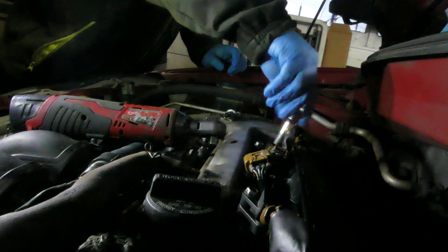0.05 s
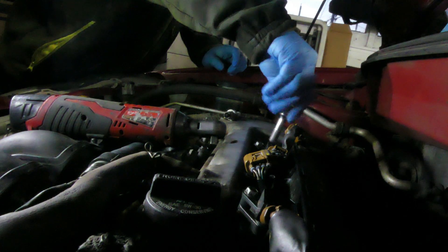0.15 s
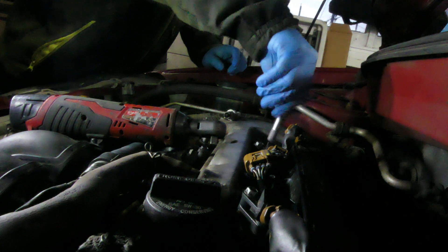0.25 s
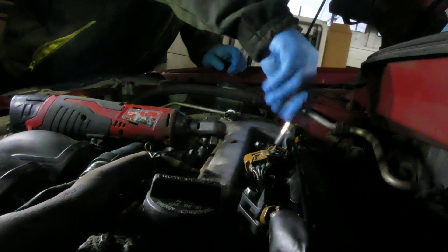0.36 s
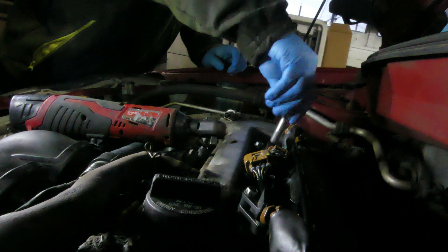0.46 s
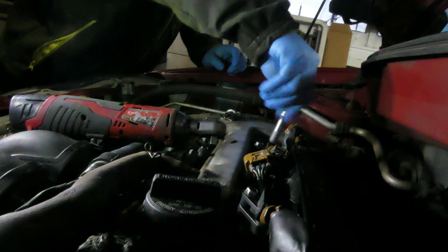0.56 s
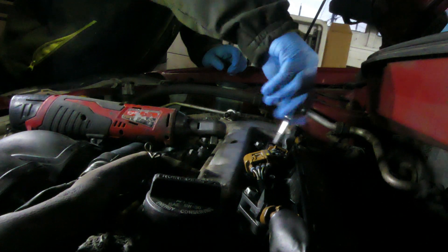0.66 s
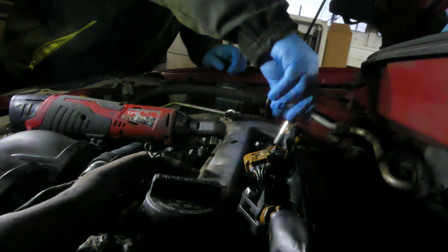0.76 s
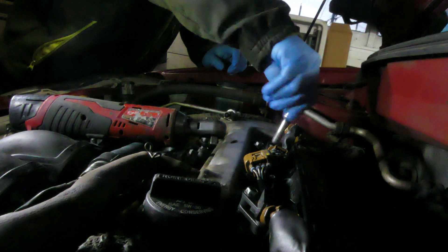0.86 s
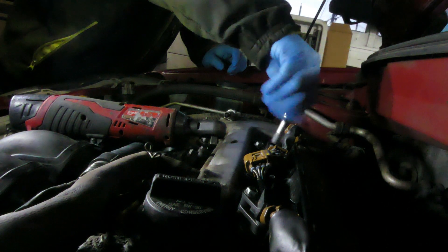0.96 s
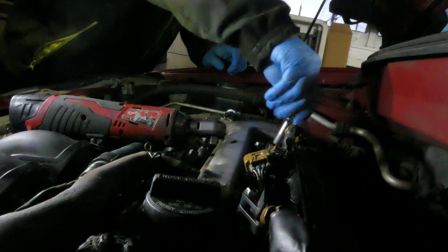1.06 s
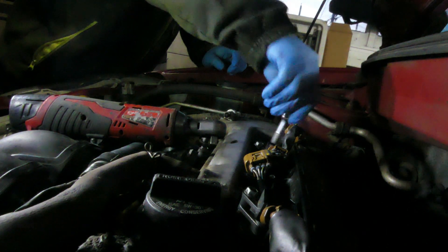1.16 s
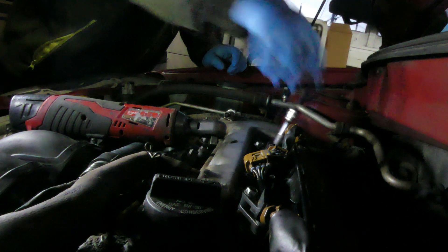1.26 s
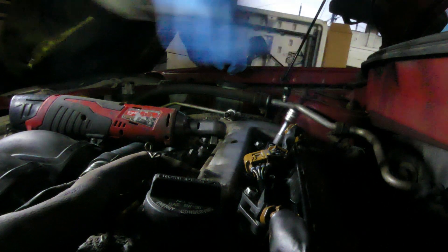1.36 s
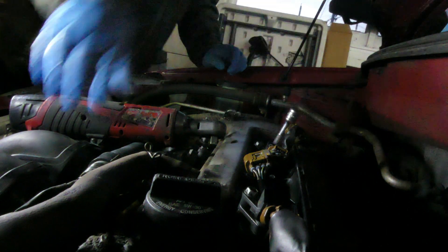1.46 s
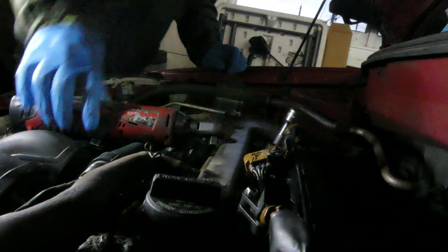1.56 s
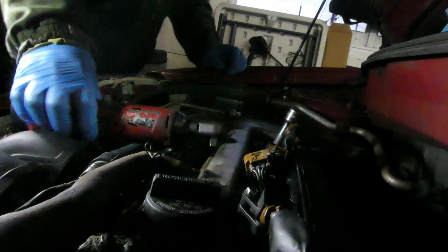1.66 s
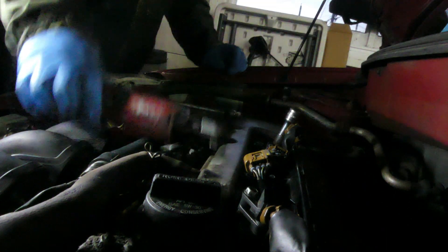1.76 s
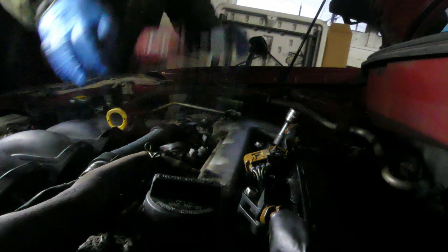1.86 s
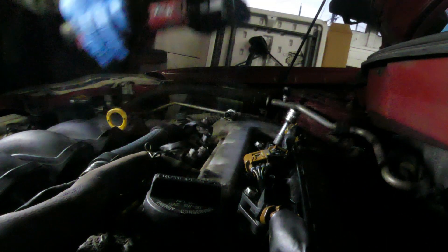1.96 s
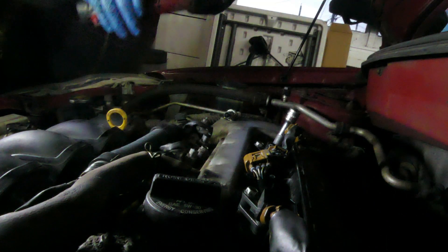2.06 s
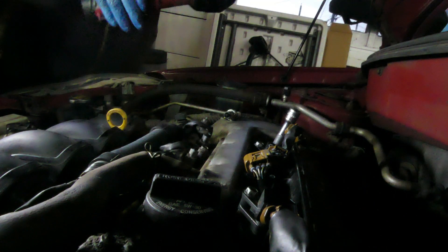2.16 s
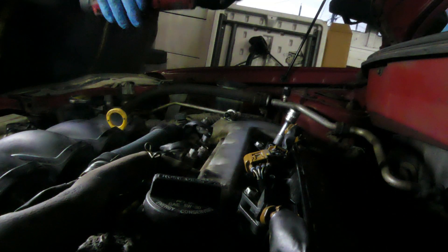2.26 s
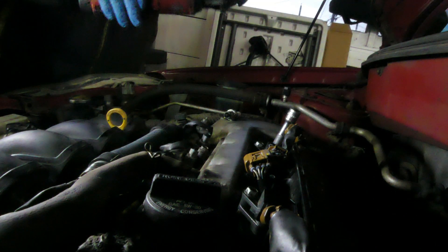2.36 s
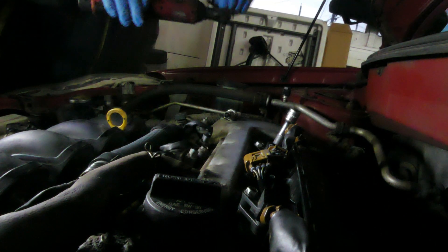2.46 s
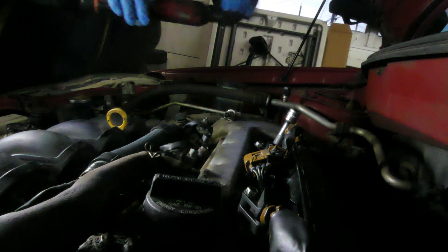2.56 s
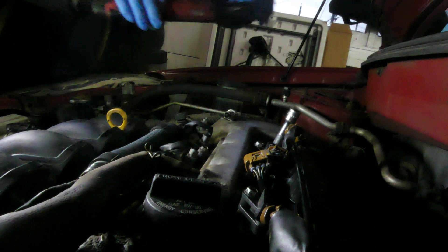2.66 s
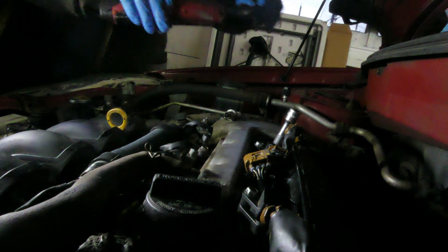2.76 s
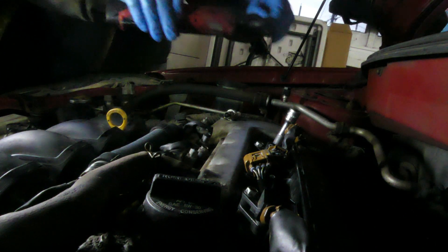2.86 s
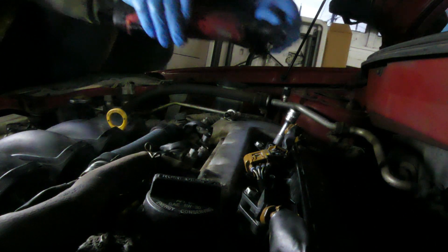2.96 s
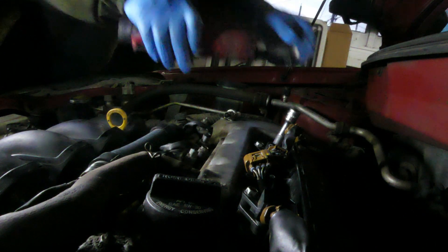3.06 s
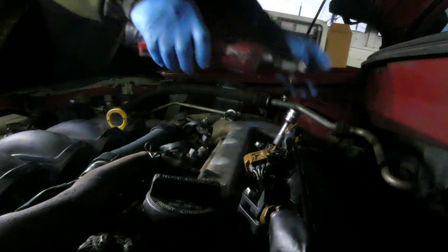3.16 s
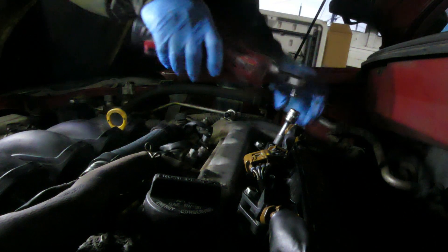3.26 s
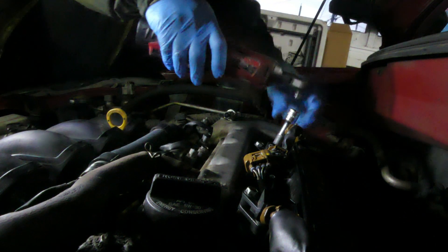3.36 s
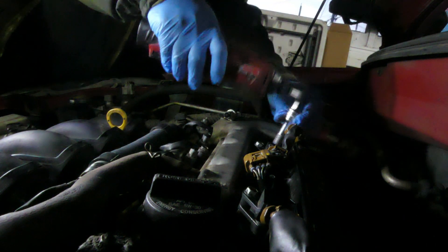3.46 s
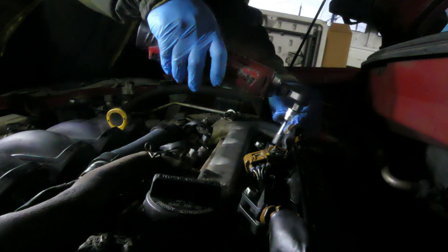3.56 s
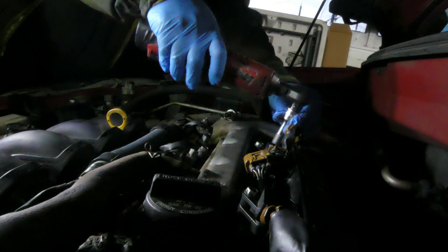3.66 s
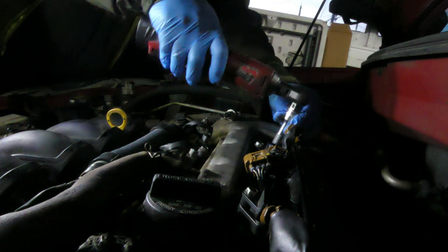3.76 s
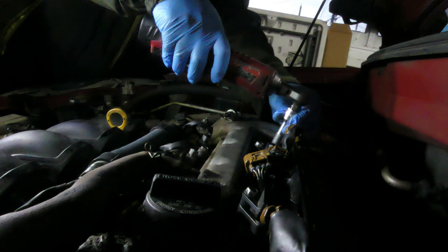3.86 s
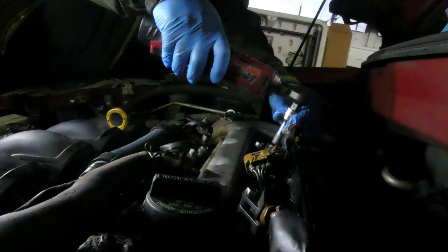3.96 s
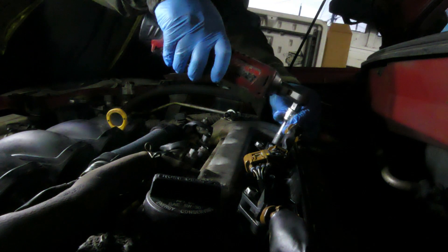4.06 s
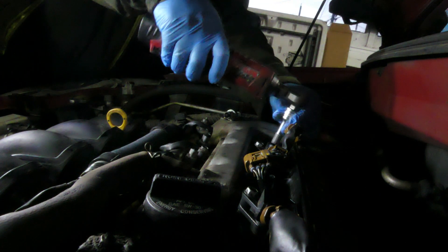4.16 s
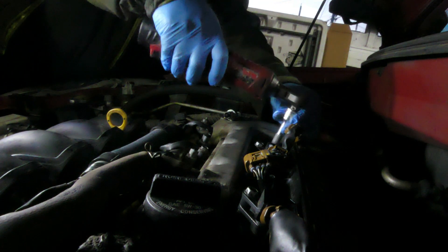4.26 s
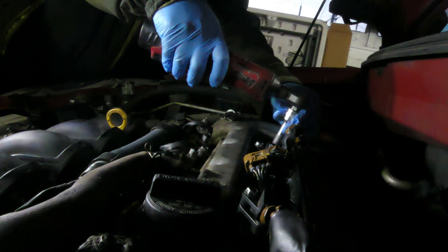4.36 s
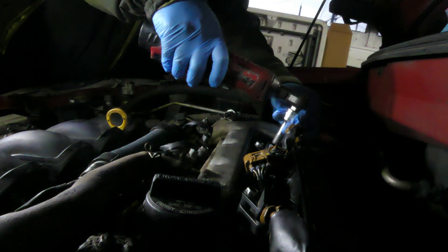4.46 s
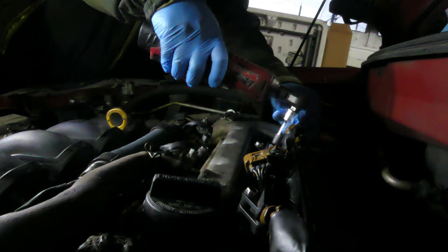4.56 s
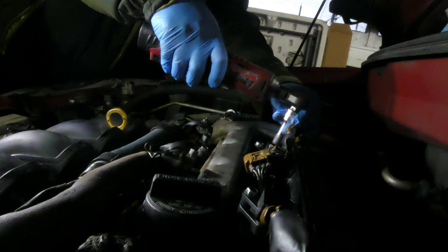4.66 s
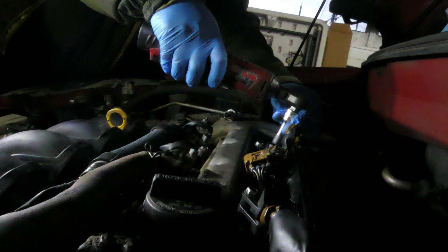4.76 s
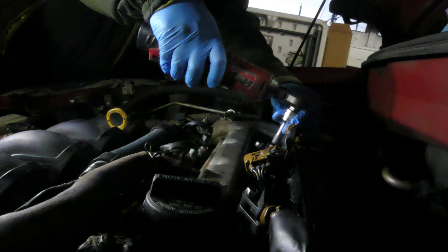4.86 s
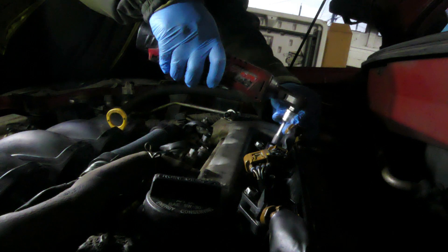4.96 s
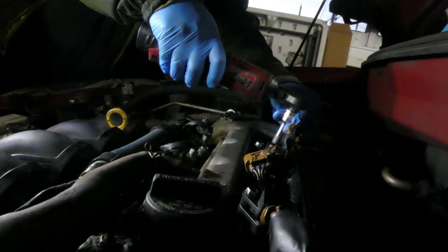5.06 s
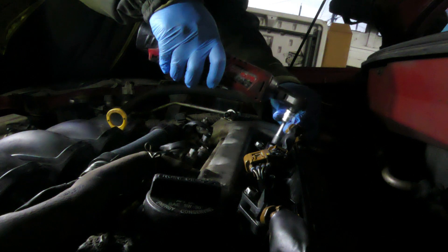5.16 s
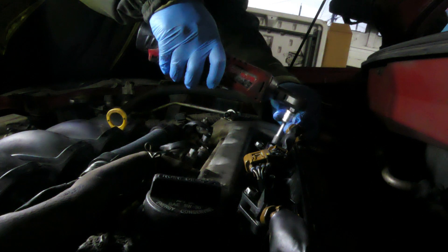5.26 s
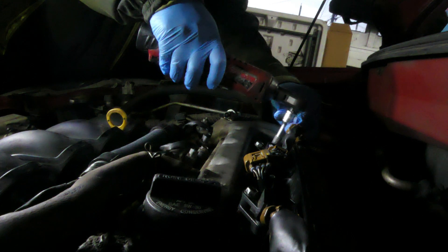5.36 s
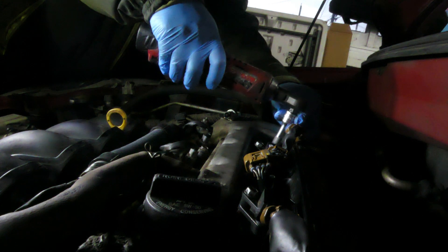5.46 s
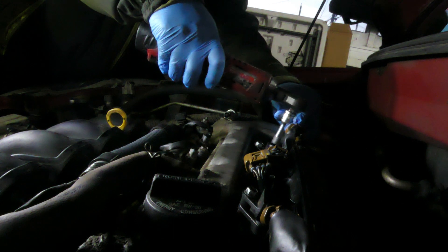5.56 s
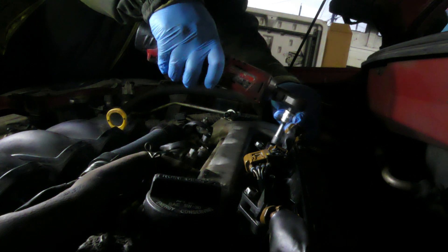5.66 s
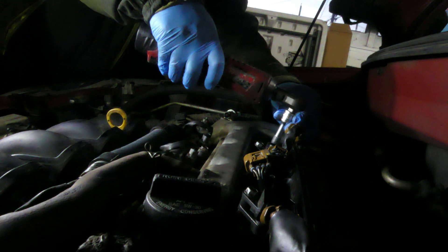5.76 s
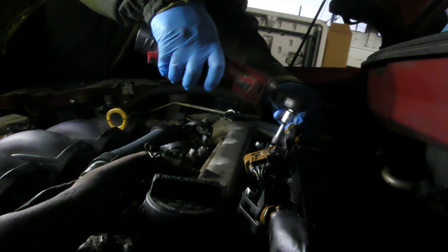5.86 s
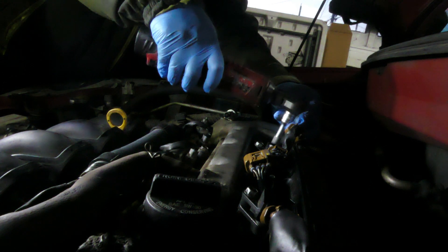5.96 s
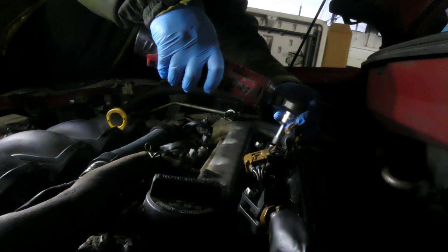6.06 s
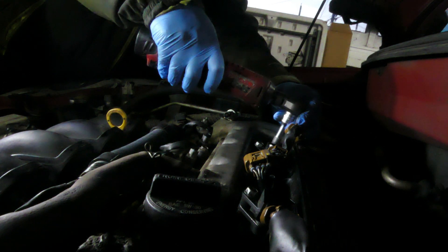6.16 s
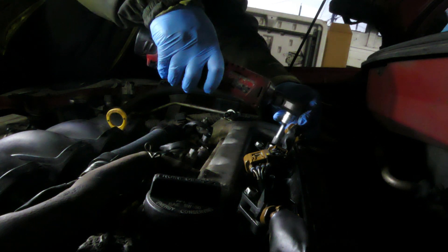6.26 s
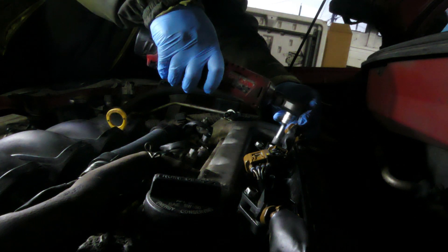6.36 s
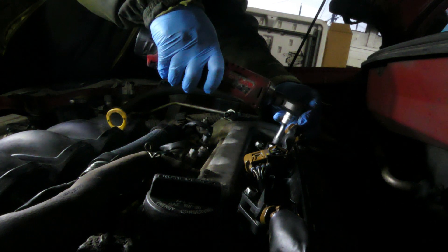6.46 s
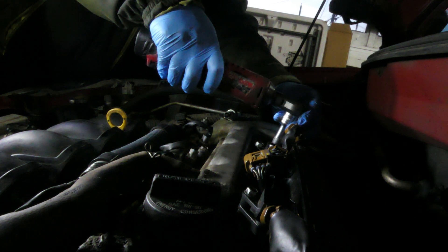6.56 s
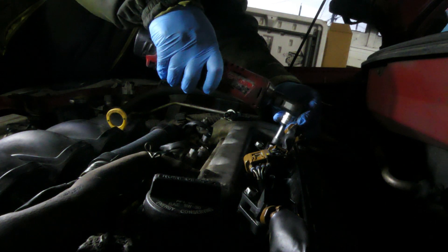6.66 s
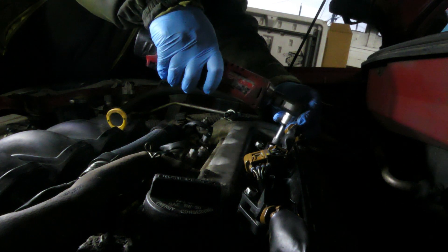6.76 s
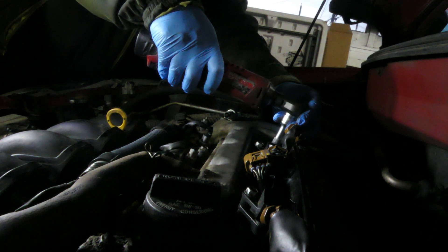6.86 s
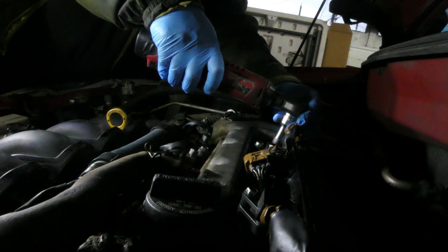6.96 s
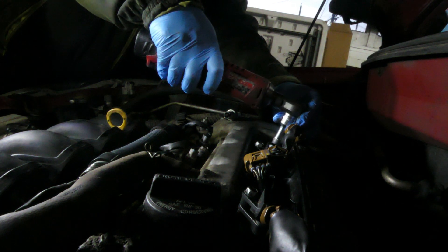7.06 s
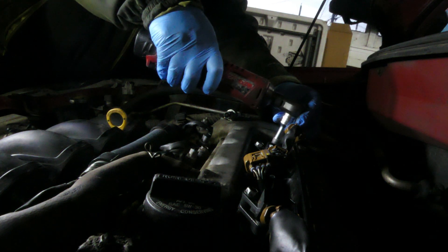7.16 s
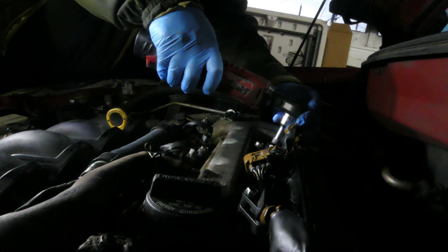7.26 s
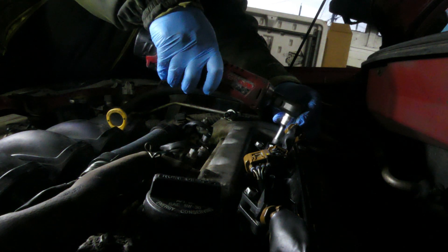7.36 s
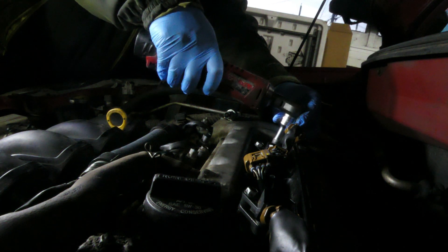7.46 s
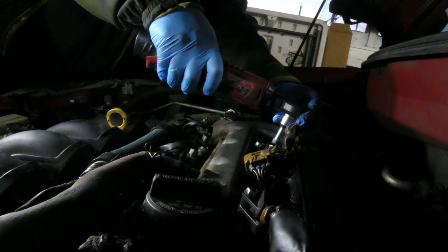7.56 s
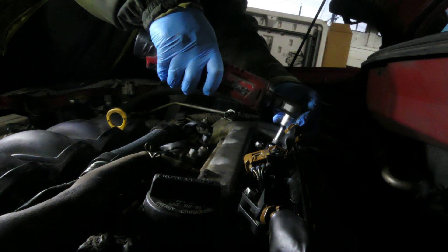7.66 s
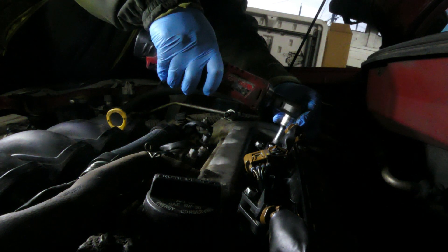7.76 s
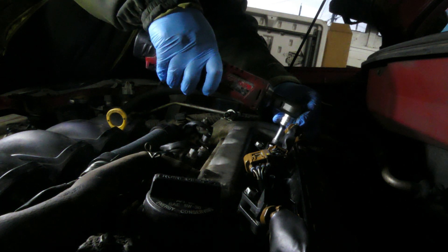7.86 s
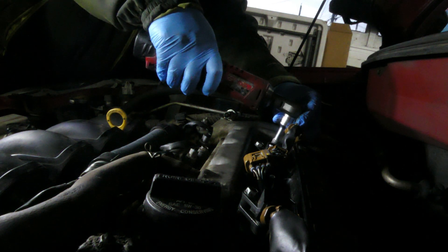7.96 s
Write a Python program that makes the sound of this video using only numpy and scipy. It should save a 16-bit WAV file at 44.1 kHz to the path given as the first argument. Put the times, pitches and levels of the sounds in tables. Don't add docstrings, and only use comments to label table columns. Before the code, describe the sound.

Close stereo perspective at an open engine bay, with a low, steady garage hum. From 0 to 1.3 s a gloved hand turns a socket extension: faint irregular ticks and small clinks, clearest around 0.6-1.1 s, with soft sleeve rub. Around 1.5 s the glove brushes metal; at 1.76 s a hard, hollow clunk as the tool is grabbed, then cloth rustle, a tiny rubber creak at 1.9 s and scattered knocks to 3.1 s, with a bright sharp snap at 2.92 s. After a tiny electric whine, the cordless ratchet spins at 3.23 s, bright and chattering, slowing from 3.5 s into separate clicks that stop near 4.05 s. At 4.12 s it restarts under load: gritty gear whirr, rapid metallic pawl clatter and yoke rattle. Speed sags around 4.6 s, recovers, drops to distinct clicks at 5.4-5.7 s, then climbs and runs on, wavering, to the end at 8 s.

```python
import sys
import numpy as np
from scipy import signal
from scipy.io import wavfile
from scipy.ndimage import uniform_filter1d

SR = 44100
rng = np.random.default_rng(int(sys.argv[2]) if len(sys.argv) > 2 else 0)


def convert_level_to_amplitude(level_db):
    exponent = np.asarray(level_db, float) / 20
    return 10 ** exponent


def file_out(sig):
    cols = np.atleast_2d(sig).T
    lim = np.clip(cols, -1, 1)
    pcm = np.round(lim * 32767).astype(np.int16)
    wavfile.write(sys.argv[1], SR, pcm)


N = 352800
T = np.arange(N) / SR

# (start [s], spin-up [s], whirr [dB], pawl [dB], yoke [dB], mesh tone [dB], start-up [dB])
PULLS = [
    (3.228, 0.014, -33.5, -28, -57, 6.5, -12),
    (4.117, 0.046, -34.5, -29.5, -31, -2.5, -12),
]
# (time [s], gear mesh [Hz], drive [dB], lean of load from yoke to pawl [dB])
FREE = [(3.23, 904, 1.5, -2), (3.34, 908, 0, 3.5), (3.44, 808, -2, -2), (3.54, 657, 1, 0),
        (3.63, 548.5, 1, 0), (3.75, 397, -2.5, -3), (3.85, 301.6, -2, 0), (3.99, 171.4, 3.5, 6),
        (4.095, 101.5, -1.5, 0)]
# (time [s], gear mesh [Hz], drive [dB], lean of load from yoke to pawl [dB])
LOADED = [(4.12, 938, 5.5, 3.5), (4.27, 988, -1.9, -3.5), (4.43, 795, -3, -4.5), (4.54, 679.9, -1.5, -0.5),
          (4.63, 584, 1.5, 0.5), (4.72, 650, 2, 1), (4.85, 745.6, -2.6, -5.5), (5.04, 791.7, -0.2, 0.5),
          (5.2, 751, -3, -3.5), (5.3, 660.2, -2, -3), (5.42, 475.2, 1, 2.5), (5.6, 299.5, -2, 3),
          (5.71, 487.4, 6, 9), (5.85, 589, 0.5, -0.5), (6.11, 647.7, -0.1, 0.5), (6.38, 534.5, 0, 1.5),
          (6.55, 507.3, -0.5, 2.5), (6.82, 486, 0.3, 2.5), (7.1, 658.6, 0.65, 1.5), (7.35, 704, -0.9, -1),
          (7.5, 681.5, -1, -1), (7.66, 664.7, 0.5, 2), (7.8, 654.4, .5, 3.5), (7.96, 651.4, 1.2, 1.5),
          (8.0, 650, -3, -2)]
# (from [s], to [s])
SLOW = [
    (3.465, 4.145),
    (5.41, 5.745),
]
# (time [s], first tooth [dB], second tooth [dB])
SNAPS = [(3.4746, -14, -12), (3.4946, -13, -16), (3.5115, -15, -14), (3.533, -13, -18), (3.553, -16, -18),
         (3.572, -17, -18), (3.594, -13, -8), (3.617, -19, -10), (3.6405, -12, -13), (3.6673, -8.5, -18),
         (3.695, -8.5, -24), (3.725, -6.5, -12), (3.7561, -8, -9), (3.791, -9, -5), (3.8312, -12, -10),
         (3.8763, -5.5, -14), (3.931, -8.5, -7), (4.005, -8.5, -5.5), (4.016, -30, -60), (3.989, -43, -57),
         (4.116, -34, -40), (4.126, -11.5, -28), (4.133, -10, -20), (5.427, -11, -13), (5.454, -14, -23),
         (5.485, -15, -22), (5.519, -14, -13), (5.5553, -15, -6), (5.599, -13, -9), (5.643, -11, -2.5),
         (5.6755, -12, -11), (5.704, -15, -11), (5.73, -12, -19)]
# (time [s], peak [dB])
RETURNS = [(3.5174, -25), (3.5588, -28), (3.5764, -28), (3.6192, -21), (3.6893, -22), (3.705, -26),
           (3.7174, -24), (3.7494, -22), (3.7684, -26), (3.7844, -26), (3.8053, -27), (3.8277, -31),
           (3.8601, -23), (3.9305, -26), (3.9414, -29), (4.005, -29), (4.0204, -28), (4.118, -28),
           (5.4123, -17), (5.438, -17), (5.468, -17.5), (5.4776, -26), (5.4992, -24), (5.5323, -22),
           (5.5464, -25), (5.5735, -19), (5.5874, -29), (5.6196, -20), (5.6344, -25), (5.6598, -16),
           (5.6895, -14), (5.7024, -18), (5.7174, -10.5), (5.7433, -18)]
# (frequency [Hz], density [dB per Hz])
WHIRR = [(88, -53), (150, -41.5), (406, -17), (475, -24), (774, -2), (980, -9), (1100, -16.5), (1230, -11),
         (1900, -9), (2150, -14.5), (2500, -8), (2920, -13), (3300, -5.5), (5150, -9), (5680, 44),
         (7620, -9.5), (9630, -9), (11500, 7), (12900, 6), (16000, -17)]
# (mesh frequency [Hz], level [dB])
MESH_BODY = [(120, -93), (440, -69), (500, -54), (590, -49), (650, -43), (705, -49.5), (785, -38),
             (880, -56), (1000, -57)]
# (mesh frequency [Hz], level [dB])
FOURTH_BODY = [(120, -66), (170, -62), (260, -70), (330, -62), (365, -49), (425, -49), (470, -59),
               (540, -51), (600, -50), (680, -57), (790, -45), (860, -47), (910, -60), (1000, -62)]
# (frequency [Hz], level [dB], t60 [s])
PAWL = [(12500, 13, 0.0058), (12570, -4, 0.01), (13120, -1, 0.016), (13540, -5, 0.0085),
        (10970, -12, 0.0089)]
# (frequency [Hz], level [dB], t60 [s])
PAWL_RUNNING = [(12360, 0.5, 0.018), (12970, 5.5, 0.019), (13136, 8.5, 0.014), (13570, -5, 0.011),
                (12900, -20, 0.0056), (11870, -13, 0.011)]
# (frequency [Hz], level [dB], t60 [s])
YOKE = [(5630, -1.5, 0.021), (5800, 2, 0.01), (6480, -1, 0.015), (6360, -21, 0.026), (7200, -6, 0.013),
        (8140, -5, 0.01), (8920, -2, 0.0069), (3980, -10.5, 0.01)]
# (from [s], to [s], level [dB])
CHOPS = [
    (3.201, 3.223, 13),
    (4.083, 4.11, 2.5),
]
# (order [1], level [dB])
CHOP = [(1, -60), (2, -51), (3, -54), (4, -64), (5, -72)]
# (frequency [Hz], level [dB], t60 [s])
SOCKET = [(1670, 5, 0.015), (5600, 6, 0.026), (6050, 2, 0.013), (6600, -6, 0.017), (7160, -4, 0.034),
          (8030, -2, 0.023), (3440, -15, 0.021)]
# (frequency [Hz], level [dB], t60 [s])
HOUSING = [(650, -14, 0.028), (980, 16, 0.0064), (1520, 12, 0.013), (1970, 1, 0.021), (2390, -7, 0.019),
           (2640, 1, 0.031), (3600, 12, 0.013), (4120, 4, 0.013), (4640, -1, 0.017), (5500, -3, 0.014),
           (6000, 3, 0.02), (7100, 4.5, 0.039)]
# (frequency [Hz], level [dB], t60 [s])
LATCH = [(6800, -15, 0.042), (9100, -21, 0.025), (12550, 1, 0.042), (12530, -2, 0.043), (12200, -12, .04),
         (12200, -5, 0.028)]
# (time [s], peak [dB], dull part [dB], bright part [dB], struck spot [Hz])
TWISTS = [(0.0994, -44, -1, -24, 5600), (0.1745, -42, -3, -27, 6060), (0.193, -46.5, 0, -23, 5600),
          (0.2505, -42, -19, -25, 6940), (0.301, -40.5, -16, -26, 5600), (0.3455, -48, -3, -23, 3520),
          (0.3638, -44, -22, -24, 5600), (0.4, -41, -24, -7, 6650), (0.4474, -35, -9, -17, 5460),
          (0.4734, -32.5, -37, -20, 7000), (0.6255, -26, -18, -15, 6800), (0.634, -30.5, -23, -23, 5800),
          (0.695, -27, -31, -21, 5190), (0.7305, -37.5, 1, -35, 6000), (0.8053, -31, -13, -24, 5600),
          (0.821, -41, -22, -28, 5600), (0.889, -32.5, -20, -10, 5800), (0.896, -33, -9.5, -22, 6800),
          (0.984, -46, -24, -13, 7500), (1.021, -56, -30, -27, 6500), (1.042, -24, -20, -25, 5800),
          (1.068, -22.5, -28, -19, 7160), (1.1867, -41, -17, -19, 6640), (1.3101, -37, -8, -15, 5800),
          (0.636, -35, -17, -30, 1600), (0.699, -34, -16, -30, 3450), (0.738, -35, -12, -30, 1130),
          (0.905, -42, -10, -25, 7100), (1.057, -40, -13, -25, 2470)]
# (time [s], peak [dB], dull part [dB], bright part [dB], struck spot [Hz])
KNOCKS = [(1.491, -36, 3, -41, 915), (1.551, -38, -7, -3, 6000), (1.618, -40, -11, -23, 900),
          (1.757, -10, -26, -19, 3890), (1.982, -29.5, -7, -21, 1850), (2.03, -20.5, -23, -19, 3560),
          (2.111, -48, 1, -21, 700), (2.152, -46, -21, -14, 5500), (2.506, -42.5, -24, -7, 7650),
          (2.541, -27, -28, -34, 2330), (2.566, -33, -31, -26, 3120), (2.701, -29, -24, -12, 6500),
          (2.924, -22.5, -22, 3, 5600), (3.03, -26.5, -21, -23, 3380), (3.051, -25.5, -30, -18, 2550),
          (3.137, -27, -15, -25, 3410), (2.703, -34.5, -22, -30, 1510), (2.954, -37, -24, -20, 2000),
          (2.594, -43, -20, -11, 6000), (1.759, -9, -19, -24, 950), (1.769, -14, -24, -28, 950),
          (2.093, -48, -13, -25, 2300), (1.7605, -6, -21, -21, 2790)]
# (time [s], peak [dB], dull part [dB], bright part [dB], struck spot [Hz])
FITS = [
    (2.9234, -7.5, -37, -23, 12900),
    (3.2372, -24.5, 4, -14, 12700),
]
# (time [s], length [s], level [dB], centre [Hz])
BRUSHES = [(0.393, 0.014, -51.5, 1500), (1.503, 0.015, -46.5, 690), (1.644, 0.034, -49, 700),
           (1.648, 0.023, -50.5, 2940), (1.855, 0.03, -55, 3670), (1.934, 0.04, -62, 230),
           (1.763, 0.0128, -66, 190), (2.161, 0.0087, -52, 5500), (2.513, 0.0089, -59, 9000),
           (2.601, 0.023, -61, 5500), (2.945, 0.022, -53, 5000), (3.86, 0.016, -43.5, 810),
           (2.203, 0.048, -65.5, 2770), (1.621, 0.0067, -44.5, 480), (1.734, 0.011, -55, 420),
           (1.902, 0.029, -50, 450), (4.043, 0.0047, -48, 2500)]
# (time [s], effort [dB])
RUSTLE = [(0.0, -50), (0.34, -62.5), (0.86, -53), (1.32, -55.5), (1.69, -45.5), (1.82, -41.5), (1.95, -44),
          (2.17, -49.5), (2.3, -58.5), (2.7, -63), (2.93, -74), (3.1, -45), (3.22, -43)]
# (time [s], pitch [Hz], level [dB])
CREAK = [(1.88, 204, -70), (1.905, 199.4, -45), (1.945, 216.5, -46), (1.97, 210, -64), (2.0, 200, -73)]
# (frequency [Hz], t60 [s])
BAY = [(200, 0.53), (1000, 0.23), (4000, 0.096), (14000, 0.14)]
# (frequency [Hz], density [dB per Hz])
HUM = [(15, -52), (25, -15), (120, -6), (200, 2.5), (277, -1.5), (363, 2), (863, -8), (1940, -9.5),
       (2990, -17), (5570, -17), (7710, -24), (13200, -20.5), (16000, -29)]
# (frequency [Hz], likeness [0-1])
SAME = [(30, .1), (120, 0.035), (300, 0.05), (1000, 0.026), (10000, 0.28)]

TEETH = 13
SECOND_TOOTH_S, SECOND_TOOTH_TURNS = .0005, (.19, .15)
RETURN_TURNS, RETURN_WHIRR_DB = (0.896, 0.49), (5.5, 8.5)
STALL_S = 3.89
STRIKE_S = 0.0008


def evened(x):
    return x / np.sqrt(np.mean(x ** 2) + 1e-20)


def read(points, hz):
    f, value = np.transpose(points)
    return np.interp(np.log(hz + 1), np.log(f + 1), value)


def curve(rows, column, off=-120.):
    rows = np.array(rows)
    return np.interp(T, rows[:, 0], rows[:, column], off, off)


def band(x, lo_hz, hi_hz):
    return signal.sosfilt(signal.butter(2, [lo_hz, hi_hz], "band", fs=SR, output="sos"), x)


def bell(x, width):
    return np.exp(-.5 * (x / width) ** 2)


def rings(modes, detune, spread_db):
    hz, db, t60 = np.transpose(modes)[:, :, None]
    t = np.arange(2600) / SR
    weight, shift, phase = rng.standard_normal((3, len(modes), 1))
    decay = convert_level_to_amplitude(db + spread_db * weight - 60 * t / t60)
    h = (decay * np.sin(2 * np.pi * hz * (1 + detune * shift) * t + 3 * phase)).sum(0)
    h *= np.minimum(t / STRIKE_S, 1)
    return h / abs(h).max()


def clatter(per_s, spread_db, count=N):
    size = convert_level_to_amplitude(spread_db * np.minimum(rng.exponential(1, count), 4))
    return size * rng.choice([-1., 1.], count) * (rng.random(count) < per_s / SR)


def struck(train, modes, count=4, detune=0.021):
    spot = rng.integers(0, count, N) == np.arange(count)[:, None]
    responses = [rings(modes, detune, 2.0) for _ in range(count)]
    return signal.oaconvolve(train * spot, responses, axes=1).sum(0)[:N]


def ratchet():
    loaded, mesh_hz, mesh, crank = shaft()
    settings = np.transpose(PULLS)[:, loaded.astype(int)]
    start, spin_up, whirr_db, pawl_db, yoke_db, tone_db, spin_up_db = settings
    drive_db, lean_db = curve(FREE + LOADED, 2, 0.), curve(FREE + LOADED, 3, 0.)
    on_db = np.where(T > start, spin_up_db * (1 - np.clip((T - start) / spin_up, 0, 1)), -120.)
    on_db = on_db - 120 * ((T > FREE[-1][0]) & ~loaded)
    slow = sum((T > a) & (T < b) for a, b in SLOW)
    wobble = 2.1 * evened(band(rng.standard_normal(N), 0.98, 51.0))
    seat_db = np.clip(rng.standard_normal((600, 5)).T, -1.6, 1.6)
    yoke_seat_db = seat_db[4, crank.astype(int)]

    tone = mesh_tone(loaded, mesh_hz, mesh, tone_db + on_db + drive_db, wobble)
    stall_db = stalling() * ((T > STALL_S) & ~loaded)
    whirr_db = whirr_db + on_db + drive_db + 1.5 * np.log2(mesh_hz / 700)
    whirr_db = whirr_db + gear_bite(mesh_hz) + stall_db
    whirr = convert_level_to_amplitude(whirr_db) * gear_grind(mesh_hz, crank, slow, yoke_seat_db)
    pawl_db = pawl_db + lean_db + .5 * on_db - 0.5 - 72 * slow
    yoke_db = yoke_db - lean_db + on_db + drive_db + stall_db - 10.0 * slow
    steady = convert_level_to_amplitude(pawl_db) * evened(running_pawl(crank, wobble, seat_db))
    steady += convert_level_to_amplitude(yoke_db) * evened(running_yoke(crank, yoke_seat_db))
    return band(tone + whirr + steady * (on_db > -99) + single_strokes(mesh_hz), 257, 19000)


def shaft():
    loaded = T >= PULLS[1][0] - .02
    free_hz, loaded_hz = (uniform_filter1d(np.interp(T, *np.transpose(pull)[:2]), size=3000)
                          for pull in (FREE, LOADED))
    mesh_hz = np.where(loaded, loaded_hz, free_hz)
    mesh = np.cumsum(mesh_hz) / SR
    crank = mesh / TEETH - .2 * loaded
    return loaded, mesh_hz, mesh, crank


def mesh_tone(loaded, mesh_hz, mesh, tone_db, wobble):
    braking = np.clip(-np.gradient(mesh_hz) * SR / 1000, 0, 1)
    tone_db = tone_db + 0.43 * wobble + 4 * loaded * braking
    coast_db = -140 * np.maximum(T - 3.58, 0) * ~loaded
    first_db = read(MESH_BODY, mesh_hz) + tone_db + coast_db
    fourth_db = read(FOURTH_BODY, mesh_hz) + tone_db - 4 * loaded + 0.44 * wobble
    return convert_level_to_amplitude(first_db) * np.cos(2 * np.pi * mesh) + convert_level_to_amplitude(fourth_db) * np.cos(8 * np.pi * mesh)


def stroke(crank, at, wide):
    return bell((crank - at + .5) % 1 - .5, wide)


def gear_grind(mesh_hz, crank, slow, yoke_seat_db):
    hz = np.fft.rfftfreq(4096, 1 / SR)
    ceiling_db = read([(4500, -8.0), (14000, -7.0)], hz)
    log_gain = np.log(convert_level_to_amplitude(np.minimum(read(WHIRR, hz), ceiling_db)))
    circle = np.r_[log_gain, log_gain[-2:0:-1]]
    body = np.fft.ifft(np.exp(np.conj(signal.hilbert(circle)))).real[:2048]
    load_db = 2.07 * stroke(crank, 0.14, 0.085)
    load_db += (5.0 + 2.16 * yoke_seat_db) * stroke(crank, 0.59, 0.12)
    grains = clatter(2500 + 6 * mesh_hz, 2.9) * convert_level_to_amplitude(load_db * (1 - 1.37 * slow))
    grind = band(signal.oaconvolve(grains, body)[:N], 180, 20000)
    grind /= np.sqrt(np.mean(band(grind, 1000, 5000)[T > 4.3] ** 2))
    hiss = convert_level_to_amplitude(4.5 * np.log2(np.minimum(mesh_hz / 640, 1)) * slow)
    return grind - band(grind, 2770, 18300) * (1 - hiss)


def gear_bite(mesh_hz):
    bite = np.zeros(N)
    for s, *_ in SNAPS:
        pull = int(s > SLOW[1][0])
        turn_s = TEETH / mesh_hz[round(s * SR)]
        back = T - s - RETURN_TURNS[pull] * turn_s
        swell = bell(back, 0.066 * turn_s) - 0.25 * bell(back, 0.26 * turn_s)
        bite += RETURN_WHIRR_DB[pull] * (s < STALL_S or pull) * swell
    for s, *_ in SNAPS[:16]:
        turn_s = TEETH / mesh_hz[round(s * SR)]
        bite += 4 * bell(T - s - 0.37 * turn_s, 0.096 * turn_s)
    return bite


def stalling():
    since = np.zeros(N)
    for s, first_db, _ in SNAPS:
        since = np.where((T >= s) & (first_db > -30), T - s, since)
    return -2 - 170 * since


def running_pawl(crank, wobble, seat_db):
    teeth = np.zeros(N)
    for k, (at, db) in enumerate([(0.026, 1.5), (0.28, -11.0), (0.56, -3.0), (0.324, -8)]):
        turns = np.floor(crank - at + 0.0095 * wobble)
        passed = np.diff(turns, prepend=turns[0]) > 0
        teeth += passed * convert_level_to_amplitude(db + 3.1 * seat_db[k, abs(turns).astype(int)])
    skid = signal.oaconvolve(teeth, np.hanning(round(0.0038 * SR)), "same") * clatter(8000, 2.6)
    return struck(skid + 0.18 * clatter(1500, 3.6), PAWL_RUNNING, count=12, detune=0.0266)


def running_yoke(crank, yoke_seat_db):
    rattle = clatter(6000 * stroke(crank, .55, .05) + 300, 0.94) * convert_level_to_amplitude(0.7 * yoke_seat_db)
    return struck(rattle, YOKE, count=12, detune=0.022)


def single_strokes(mesh_hz):
    snaps, returns = np.zeros((2, N))
    for s, first_db, second_db in SNAPS:
        turn_s = TEETH / mesh_hz[round(s * SR)]
        second_s = s + SECOND_TOOTH_S + SECOND_TOOTH_TURNS[int(s > SLOW[1][0])] * turn_s
        snaps[round(s * SR)] = convert_level_to_amplitude(first_db + 1.5)
        snaps[round(second_s * SR)] = convert_level_to_amplitude(second_db - 6.5)
    for s, db in RETURNS:
        returns[round(s * SR)] = convert_level_to_amplitude(db - 1)
    pawl = 0.82 * struck(snaps, PAWL) + 0.076 * band(snaps, 3700, 13000)
    pawl += 0.39 * struck(np.roll(snaps, round(0.0022 * SR)), PAWL_RUNNING)
    yoke = struck(returns + convert_level_to_amplitude(-26) * snaps, YOKE) + 0.8 * band(returns, 2500, 11000)
    return pawl + yoke


def chopper():
    whine = sum(convert_level_to_amplitude(db - 4.5) * np.sin(2 * np.pi * k * 1868 * T) for k, db in CHOP)
    return whine * sum(convert_level_to_amplitude(db) * np.clip((T - a) / 0.016, 0, 1) * (T < b) for a, b, db in CHOPS)


def hits(events, modes, dull_hz, dull_t60, chatter_s, ring_db, dull_gain_db, crack_db, pan_db):
    out, t = np.zeros((2, N + 4000)), np.arange(4000) / SR
    a, b, c, d = rng.standard_normal((len(events), 4000, 4)).transpose(2, 0, 1)
    dull = evened(band(a, *dull_hz)) * convert_level_to_amplitude(dull_gain_db - 60 * t / dull_t60) * np.clip(t / 0.0039, 0, 1)
    bright = evened(band(b, 9600, 14300)) * convert_level_to_amplitude(-2.5 - 60 * t / 0.025)
    crack = evened(band(c, 820, 6350)) * convert_level_to_amplitude(crack_db - 60 * t / (2.3 * dull_t60))
    chatter = (t == 0) + 0.086 * d * (abs(d) > 2.1) * np.exp(-t / chatter_s)
    for k, (s, db, dull_db, bright_db, spot_hz) in enumerate(events):
        weighed = [(hz, mode_db - 8 * abs(np.log2(hz / spot_hz)), 0.59 * t60)
                   for hz, mode_db, t60 in modes]
        weighed += [(spot_hz, 2, 0.022)]
        ring = signal.fftconvolve(chatter[k], rings(weighed, .015, 2.0))[:4000]
        sound = convert_level_to_amplitude(ring_db) * ring / abs(ring).max()
        sound = sound + convert_level_to_amplitude(dull_db) * dull[k] + convert_level_to_amplitude(bright_db) * bright[k] + crack[k]
        out[:, round(s * SR):][:, :4000] += convert_level_to_amplitude(db + np.array([[pan_db], [-pan_db]]) / 2) * sound
    return out[:, :N]


def brushes():
    out = np.zeros(N)
    for s, length, db, hz in BRUSHES:
        t = np.arange(-3 * length, 3 * length, 1 / SR)
        grains = clatter(4000, 2.9, SR // 2)[:len(t)]
        scrape = bell(t, length) * evened(band(grains, hz / 2.0, hz * 1.32))
        out[round((s + t[0]) * SR):][:len(t)] += convert_level_to_amplitude(db) * scrape
    return out


def cloth():
    grains, effort_db = clatter(3000, 0.99), curve(RUSTLE, 1, -200.)
    rub = convert_level_to_amplitude(effort_db - 10.0) * evened(band(grains, 79, 2540))
    hiss_db = -22.5 + 0.64 * effort_db - 7.0
    rub += convert_level_to_amplitude(hiss_db) * evened(band(grains[::-1], 2900, 13000))
    phase = 2 * np.pi * np.cumsum(curve(CREAK, 1, 200.)) / SR
    creak = np.sin(phase) + .2 * np.sin(2 * phase) + 0.48 * np.sin(3 * phase)
    return rub + convert_level_to_amplitude(curve(CREAK, 2)) * creak


def shifting(per_s):
    return np.cos(2 * np.pi * (per_s * T + np.arange(3)[:, None] / 3)) * np.sqrt(2 / 3)


def near_metal(x):
    taps = np.zeros((3, 400))
    at = rng.integers(16, 400, (3, 30))
    fading = rng.choice([-1., 1.], at.shape) * np.exp(-at / SR / 0.003 / 2)
    np.put_along_axis(taps, at, fading, 1)
    taps /= np.linalg.norm(taps, axis=1)[:, None]
    bounces = signal.oaconvolve(x.mean(0)[None], taps, axes=1)[:, :N]
    side, shadow = ((shifting(per_s) * bounces).sum(0) for per_s in (2.3, -0.7))
    coloured = x + convert_level_to_amplitude(-9.5) * band(shadow, 1440, 5300)
    return coloured + convert_level_to_amplitude(-10.5) * band(side, 570, 18000) * np.array([[1.], [-1.]])


def bay(x):
    taps = np.zeros((2, SR // 2))
    at = np.arange(60, SR // 2 - 20, 20) + rng.integers(0, 20, (2, (SR // 2 - 61) // 20))
    np.put_along_axis(taps, at, rng.choice([-1., 1.], at.shape), 1)
    hz, t, z = signal.stft(taps, SR, nperseg=128)
    tail = signal.istft(z * convert_level_to_amplitude(-60 * t / read(BAY, hz)[:, None]), SR, nperseg=128)[1]
    return signal.fftconvolve(x, tail / np.linalg.norm(tail[0]), axes=1)[:, :N]


def garage():
    frames, hz = N // 256 + 5, np.fft.rfftfreq(1024, 1 / SR)
    a, b, c, d, patches = rng.standard_normal((frames, 513, 5)).T
    patches = evened(uniform_filter1d(uniform_filter1d(patches, size=8, axis=0), size=14, axis=1))
    patch_db = read([(100, 2.3), (400, 2.1), (1500, 1.2)], hz)[:, None] * patches
    same, left = np.clip(read(SAME, hz), -1, 1)[:, None], a + 1j * b
    right = same * left + np.sqrt(1 - same ** 2) * (c + 1j * d)
    z = np.array([left, right]) * convert_level_to_amplitude(read(HUM, hz)[:, None] + patch_db)
    return convert_level_to_amplitude(-56) * evened(signal.istft(z, nperseg=1024, noverlap=768)[1][:, :N])


def scene():
    tool = (ratchet() + chopper()) * convert_level_to_amplitude(np.array([[-.9], [0.]]))
    hand = hits(TWISTS, SOCKET, dull_hz=(800, 2500), dull_t60=0.033, chatter_s=0.0082,
                ring_db=-0.91, dull_gain_db=2.7, crack_db=-21.0, pan_db=-1.6)
    hand += hits(KNOCKS, HOUSING, dull_hz=(300, 1500), dull_t60=0.047, chatter_s=0.01,
                 ring_db=-3.0, dull_gain_db=0.54, crack_db=-19.5, pan_db=0.53)
    hand += hits(FITS, LATCH, dull_hz=(800, 4500), dull_t60=0.016, chatter_s=0.0033,
                 ring_db=-1.5, dull_gain_db=1.2, crack_db=-29.0, pan_db=-.4)
    hand += cloth() + brushes()
    bright_tool = band(tool, 1300, 19000)
    tool_echo = sum(bay(convert_level_to_amplitude(-9.0) * weight * bright_tool) for weight in shifting(0.903))
    return near_metal(tool + hand) + bay(convert_level_to_amplitude(-9.0) * hand) + tool_echo + garage()


def band_limit(x):
    return signal.sosfilt(signal.butter(12, 16960, fs=SR, output="sos"), x)


def record(dry):
    thin = signal.sosfilt(signal.butter(2, 55, "high", fs=SR, output="sos"), dry)
    dipped = signal.lfilter(*signal.iirnotch(7500, 90, SR), thin)
    edged = signal.oaconvolve(dipped, signal.firwin(767, 15780, fs=SR)[None], "same")
    return band_limit(edged)


dry = scene()
out = record(dry)
file_out(out)
```